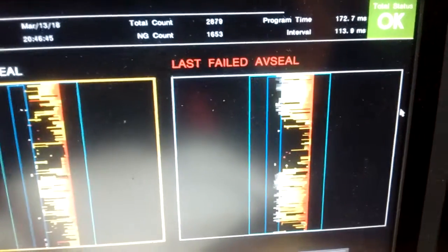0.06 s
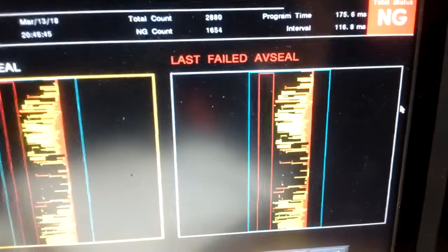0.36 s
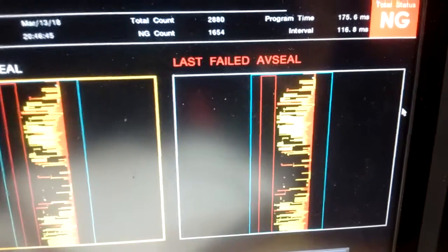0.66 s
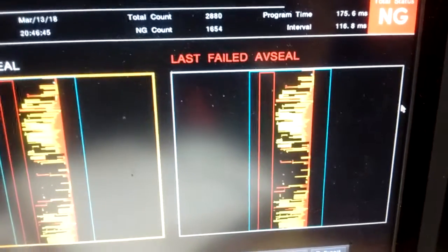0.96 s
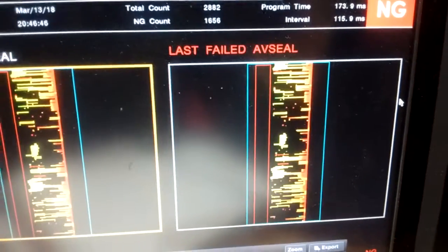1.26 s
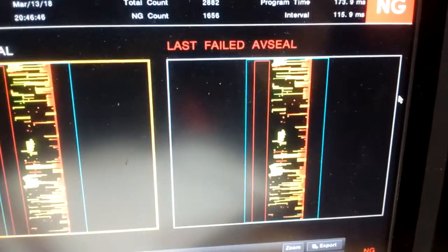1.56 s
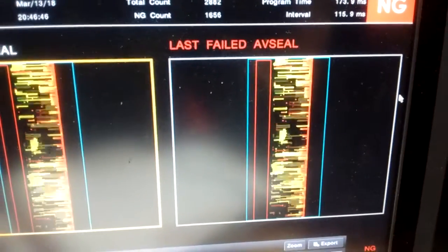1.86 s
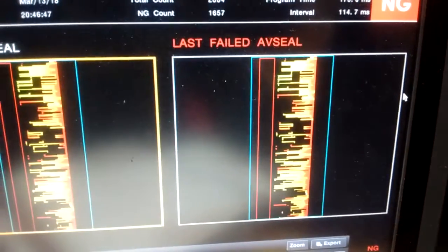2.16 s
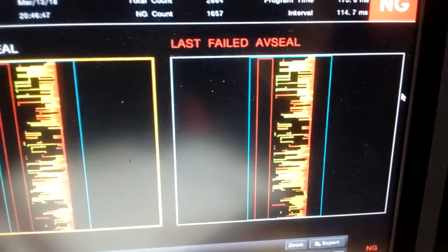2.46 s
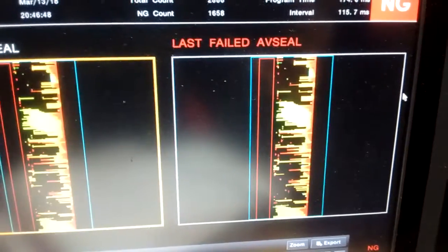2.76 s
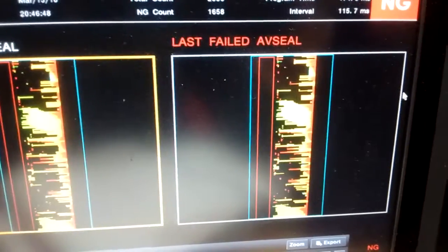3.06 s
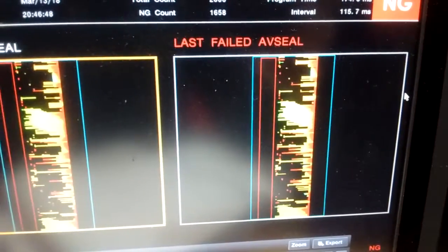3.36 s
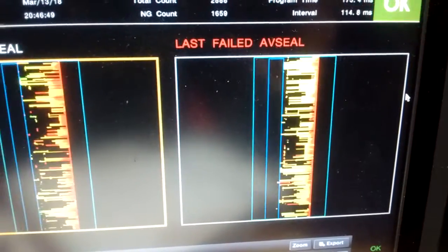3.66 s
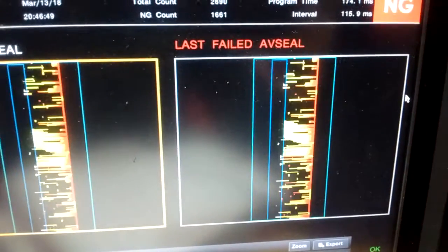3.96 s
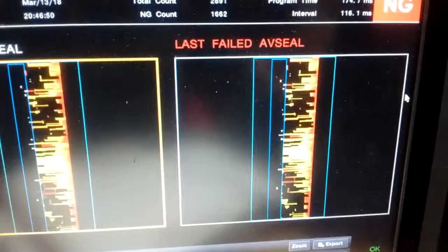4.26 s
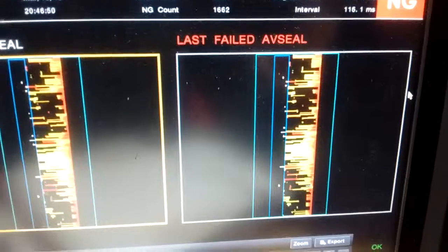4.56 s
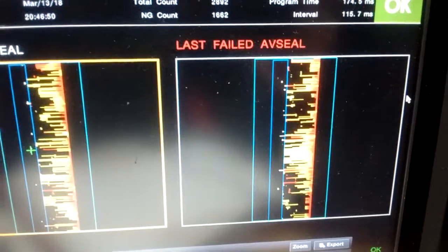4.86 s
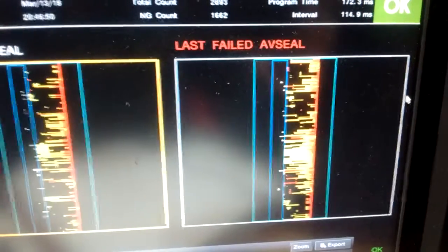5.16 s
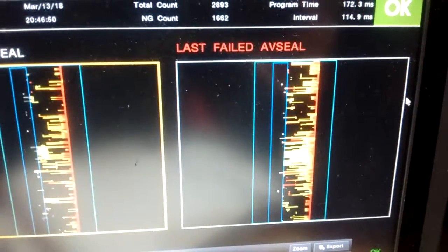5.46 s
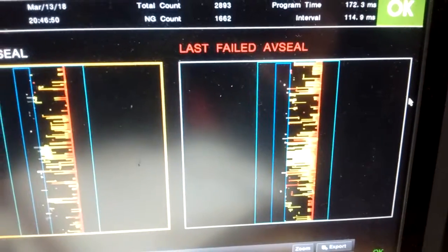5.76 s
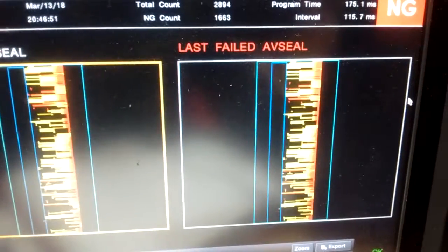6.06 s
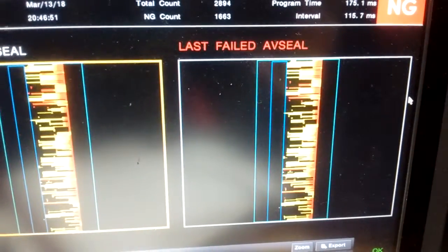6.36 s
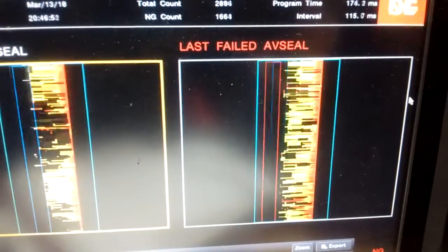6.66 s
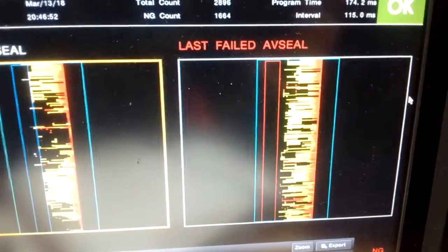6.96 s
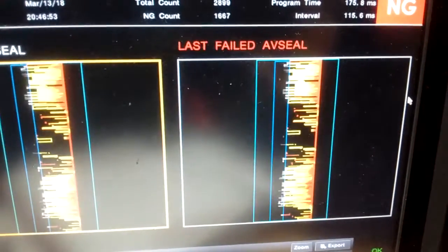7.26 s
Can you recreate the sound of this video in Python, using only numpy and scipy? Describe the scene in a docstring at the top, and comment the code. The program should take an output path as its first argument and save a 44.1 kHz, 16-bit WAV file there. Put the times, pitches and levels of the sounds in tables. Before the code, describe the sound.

A deep, throbbing drone from a shaking feeder tray dominates a factory packing line, over steady air hiss, churning parts and fast, even puffs with small metal pings. The drone stops with a brief ring a little past the middle, then a motor's hum and thin whistle fade too. The machine keeps cycling as packs brush a guide rail and one slaps onto a chute, sliding down with hollow thuds.

```python
"""A loud, throbbing drone fills a factory hall: a feeder tray on a packing line, shaken by a magnet.
The feeder cuts out, and a drive motor hums and whines for a second longer. All along, a machine keeps
cycling: air hisses, a jet puffs, the works churn and a metal part rings once a stroke. Late on, packs
scrape a rail and one knocks and tumbles down a chute. An automatic volume control holds the loud
drone down, so the rest comes up once it is gone."""
import sys
import numpy as np
from scipy import signal
from scipy.fft import rfft, irfft, next_fast_len
from scipy.io import wavfile
from scipy.ndimage import uniform_filter1d, map_coordinates

SR = 44100
rng = np.random.default_rng(int(sys.argv[2]) if len(sys.argv) > 2 else 0)


def store_wav(level_fs):
    """Save 16-bit WAV to argv[1]."""
    pcm = np.round(np.clip(np.atleast_2d(level_fs), -1, 1) * 32767)
    wavfile.write(sys.argv[1], SR, pcm.T.astype(np.int16))


N = 327663
T = np.arange(N) / SR
MAINS_HZ = 49.95  # the electric supply
STROKE_S, STROKE_START_S = .3867, .2  # the machine's cycle

# The feeder's drone: mains_multiple, level_db, lean_db (how much louder on the left than the right)
DRONE_TONES = [(2, -30.5, -9), (3, -44.5, -17), (4, -17.5, -6.5), (5, -22, 3.5), (6, -38.5, -16),
               (7, -50, 4), (9, -44, -8), (15, -48.5, -12)]
# Swings of the loaded tray, which throb against the drone: pitch_hz, level_db, lean_db
SWAY_TONES = [(212.5, -39.5, -3), (212, -46, -7), (222.5, -37, -7), (308.7, -45.5, 4)]
# The tray's own notes: pitch_hz, level_db, fade_s (a fade is the time taken to drop 60 dB)
TRAY_NOTES = [(259.4, -17, 0.48), (284.6, -16, 0.57)]
# Loose goods shaking on the tray: pitch_hz, level_db_per_hz
RATTLE_NOISE = [(90, -87), (170, -57.5), (203, -45), (212, -36.5), (226, -46), (240, -55), (280, -53),
                (310, -48.5), (335, -65.5), (600, -99)]
# The motor's magnetic hum: mains_multiple (rounded when played), level_db, lean_db
HUM_TONES = [(2, -34, -26), (4, -30, -13.5), (6, -35, -32), (8, -37.5, -6), (10, -38.5, -4),
             (11.9, -46, 15), (16, -41.5, -5), (18, -41, 3), (20, -40, -9), (22, -44.5, -5),
             (24, -43.5, -1), (30, -49.5, -3), (34, -44, 0), (36, -56, 3), (52, -48, 10)]
# Tones of its gears and its inverter (the speed control): pitch_hz, level_db, lean_db
WHINE_TONES = [(719, -42.5, 4), (772, -48, -16), (832, -49.5, -4), (866, -43.5, 1), (1009, -42, -1),
               (1118, -45, 0), (1354, -45, 1), (1528, -46, -1), (2860, -58, -7)]
# The inverter's thin whistle: pitch_hz, level_db_per_hz
WHISTLE_NOISE = [(14700, -110), (14980, -72), (15060, -59), (15107, -57), (15160, -64), (15260, -72),
                 (15500, -110)]
# The motor's cooling fan: pitch_hz, level_db_per_hz
FAN_NOISE = [(60, -81), (150, -62), (350, -68), (450, -57.5), (650, -62.5), (850, -57), (1150, -58),
             (1550, -60), (2100, -62), (2750, -55), (3050, -57), (3400, -60), (4200, -65.5), (5200, -65),
             (9000, -70), (14000, -74)]
# The air jet: pitch_hz, level_db_per_hz
JET_NOISE = [(5000, -109), (8300, -68), (9400, -61), (10900, -62.5), (12000, -67), (13200, -71.5),
             (14900, -69.5), (15500, -72)]
# The air leak: pitch_hz, level_db_per_hz
LEAK_NOISE = [(700, -94), (1800, -68.5), (2400, -64.5), (2750, -62.5), (3000, -70), (3300, -63.5),
              (3700, -64), (4100, -62.5), (4800, -68), (5500, -66), (6000, -66), (6700, -61.5),
              (7300, -59.5), (7750, -58), (8250, -59.5), (9000, -66.5), (11000, -70), (14000, -80.5)]
# Air pressure behind the jet and the leak: time_s, gain_db
AIR_PRESSURE = [(0, -0.5), (4.1, 0), (4.6, 2), (5.3, 0.8), (6.3, -1), (6.9, -1), (7.43, 0.2)]
# The machine's moving parts: pitch_hz, level_db_per_hz
CHURN_NOISE = [(25, -96), (45, -95), (65, -76), (90, -61), (125, -63.5), (185, -53.5), (260, -60),
               (350, -64.5), (500, -59.5), (700, -61.5), (1000, -61), (1500, -64), (2200, -70),
               (5000, -76.5)]
# Surges and lulls in their churning: middle_s, half_width_s, gain_db
CHURN_SURGES = [(.4, 0.042, 5.5), (2.78, 0.029, 3), (5.55, 0.026, -1.5), (6.92, 0.065, -2)]
# Brushes against the metal part: start_s, level_db
METAL_BRUSHES = [(.58, -24), (.967, -23), (1.353, -24.5), (1.74, -22), (2.126, -19), (2.513, -27),
                 (2.9, -26), (3.287, -26), (3.673, -25), (4.06, -24), (4.447, -23), (4.833, -26),
                 (5.22, -25), (5.606, -22), (5.993, -25), (6.38, -23.5), (6.766, -19), (7.153, -22)]
# The pack hitting the chute: start_s, thud_db, thud_hz, thud_fade_s, slap_gain_db
PACK_HITS = [(6.514, -6, 940, 0.012, 5.5), (6.517, -6, 404, 0.018, 7), (6.517, -13, 262, 0.044, 4),
             (6.595, -18, 165, 0.11, -3), (6.65, -22, 292, 0.09, 3), (6.675, -14.5, 271, 0.08, 5),
             (6.753, -20, 238, 0.07, 4), (6.797, -17, 245, 0.08, 5)]
# The pack slapping and sliding on the chute: pitch_hz, level_db_per_hz
CHUTE_NOISE = [(60, -88), (140, -57), (260, -47), (345, -59.5), (420, -53.5), (560, -60), (730, -52.5),
               (900, -58), (1050, -56.5), (1350, -60), (2000, -62), (3500, -64), (7000, -94)]
# Packs touching the guide rail: middle_s, half_width_s, gain_db
RAIL_TOUCHES = [(5.47, 0.01, -4), (6.22, 0.044, -5), (7.02, 0.0061, -5)]
# Their rubbing sound: pitch_hz, level_db_per_hz
RAIL_NOISE = [(300, -96), (700, -56), (1300, -54.5), (1800, -63), (3000, -86)]
# How alike left and right sound, and which leads: pitch_hz, likeness_0_to_1, left_lead_radians
STEREO_IMAGE = [(101, 0.92, 0.28), (485, 0.69, 1.44), (970, 0.72, -0.03), (1700, 0.9, 0.51),
                (2340, 0.3, -1.9), (2573, 0.98, -2.5), (2730, 0.98, -3), (3364, 1, -3), (3606, 0, -5.5),
                (4700, 1, -6.5), (4830, 0.84, -5.5), (5480, 0.1, -8.5), (6255, 1, -9.5),
                (7390, 0.36, -10.5), (7630, 1, -12), (8650, 0.53, -12), (9120, 0.3, -15), (9800, 0.47, -15),
                (11000, 0.2, -10.5), (11200, 0.8, -11), (12000, 0.15, -11.5), (14000, .34, -15.5),
                (15100, .6, -13.5)]
# Which side the noise is louder on: pitch_hz, lean_db
STEREO_LEAN = [(100, -5.5), (450, -3.5), (900, -4.5), (1500, -0.5), (2300, 2), (3200, -0.5), (4100, 2),
               (6200, -0.5), (7900, -4.5), (10500, -2), (12000, 4), (15000, 7)]


def feeder(off_s=4.195, coast_s=0.029, swing_rise_s=0.016):
    """A magnet shakes the tray in time with the mains; the load throbs against it and the goods rattle."""
    drone = sum(tone(round(multiple) * MAINS_HZ, db, lean, flutter_db=0, drift_radians=0.084)
                for multiple, db, lean in DRONE_TONES)
    sway = sum(tone(hz, db, lean, flutter_db=0.5, drift_radians=0.34) for hz, db, lean in SWAY_TONES)
    running = (drone + sway) * run_down(off_s + coast_s, fade_s=0.23)
    goods = pan(lean_db=-6.5) * noise(RATTLE_NOISE) * run_down(off_s, fade_s=0.67)
    # once the magnet lets go, the tray rings out on its own notes
    t = np.maximum(T - off_s, 0)
    notes = sum(amp(db - 60 * t / fade_s) * np.sin(2 * np.pi * hz * t) for hz, db, fade_s in TRAY_NOTES)
    swing = notes * (1 - np.exp(-t / swing_rise_s))
    return running + goods + pan(lean_db=0) * swing


def motor(off_s=5.14):
    """The motor hums, whines and whistles until its power goes; its fan spins on a little longer."""
    hum = 0
    for multiple, db, lean in HUM_TONES:
        lag = round(multiple) ** 2 * np.pi / 9  # the frame delays high tones more, smoothing the buzz
        hum += tone(round(multiple) * MAINS_HZ, db, lean, flutter_db=1.1, drift_radians=.12,
                    lag=lag, left_lead=stereo_lead(multiple * MAINS_HZ))
    whine = sum(tone(hz, db, lean, flutter_db=2.0, drift_radians=0.32, left_lead=stereo_lead(hz))
                for hz, db, lean in WHINE_TONES)
    whistle = pan(lean_db=11) * noise(WHISTLE_NOISE)
    fan = hall_noise(FAN_NOISE, ripple_db=1.2) * amp(0.98 * wobble(7))
    return (hum + whine + whistle) * run_down(off_s, fade_s=0.48) + fan * run_down(off_s, fade_s=1.0)


def air_jet(opens_s=0.054, open_for_s=0.23, rise_s=0.032, fall_s=0.075, seep_db=-22):
    """A valve lets out a puff of air once a stroke; a little seeps through while it is shut."""
    t = (T - STROKE_START_S - opens_s) % STROKE_S
    opening = 1 - np.exp(-t / rise_s)
    closing = bump(np.maximum(t, open_for_s), open_for_s, fall_s)
    flow = np.hypot(opening * closing, amp(seep_db))
    gain_db = 1.44 + pressure_db()
    return hall_noise(JET_NOISE, ripple_db=-2.5) * flow * amp(gain_db + 1.3 * wobble(38))


def air_leak(sag_db=2.5):
    """Leaking air hisses, and sags in mid-stroke while the jet draws on the same supply."""
    t = (T - STROKE_START_S) % STROKE_S
    gain_db = 1.5 + pressure_db() - sag_db * bump(t, middle_s=0.2, half_width_s=0.031)
    return hall_noise(LEAK_NOISE, ripple_db=1.2) * amp(gain_db + 0.88 * wobble(22))


def churning_parts(base_db=-0.27, swell_db=1.43, peak_s=0.056):
    """The moving parts churn harder twice a stroke: on the way out and on the way back."""
    strokes = (T - STROKE_START_S - peak_s) / STROKE_S
    stroke_db = base_db + swell_db * np.cos(2 * np.pi * 2 * strokes)
    surge_db = sum(db * bump(T, s, width) for s, width, db in CHURN_SURGES)
    churn = hall_noise(CHURN_NOISE, ripple_db=3.0)
    flicker_db = 0.46 * wobble(12) + 1.26 * wobble(45)
    return churn * amp(stroke_db + surge_db + flicker_db)


def metal_pings(pitch_hz=2386, fade_s=0.19, rise_s=0.0045, rough_radians=.6):
    """A metal part is brushed once a stroke and gives a short, rough ring."""
    t = np.arange(SR // 2) / SR
    shape = amp(-60 * t / fade_s) * (1 - np.exp(-t / rise_s))
    brushes = np.zeros(N)
    for start_s, db in METAL_BRUSHES:
        brushes[round(start_s * SR)] = amp(db)
    loudness = signal.fftconvolve(brushes, shape / shape.max())[:N]
    ring = loudness * np.sin(2 * np.pi * pitch_hz * T + rough_radians * wobble(90))
    return np.array([ring, -ring])  # left and right swing opposite ways


def tumbling_pack(slap_fade_s=0.028, peak_s=6.645, stop_s=6.885, rise_db_per_s=60, fall_db_per_s=45):
    """A pack slaps onto the chute, then slides and tumbles with hollow thuds."""
    thuds, slaps = np.zeros(N), np.zeros(N)
    t = np.arange(SR // 3) / SR
    contact = 1 - np.exp(-t / .0005)  # each hit builds in half a millisecond
    for start_s, db, hz, fade_s, slap_db in PACK_HITS:
        start = round(start_s * SR)
        span = slice(start, start + len(t))
        thuds[span] += amp(db - 60 * t / fade_s) * contact * np.sin(2 * np.pi * hz * t)
        slaps[span] += amp(slap_db - 60 * t / slap_fade_s) * contact
    # the slide grows to a peak, then the pack slows and comes to rest
    slide_db = 2 - np.maximum(rise_db_per_s * (peak_s - T), fall_db_per_s * (T - peak_s))
    landed = T > PACK_HITS[0][0]
    slide = landed * amp(slide_db + 0.73 * wobble(140)) * run_down(stop_s, fade_s=0.049)
    scuffs = np.hypot(slide, slaps) * hall_noise(CHUTE_NOISE, ripple_db=1.5)
    low_cut = signal.butter(2, 135, "highpass", fs=SR, output="sos")  # trims the deep bass
    return signal.sosfilt(low_cut, pan(lean_db=-7) * thuds + scuffs)


def rail_scrapes():
    """Now and then a pack rubs along a guide rail, in a short grainy swell."""
    rubbing = sum(amp(db) * bump(T, s, width) for s, width, db in RAIL_TOUCHES)
    return hall_noise(RAIL_NOISE, ripple_db=0.5) * rubbing * amp(1.8 * wobble(120))


def pressure_db():
    """How much the air pressure lifts or lowers the jet and the leak at each moment."""
    return np.interp(T, *np.transpose(AIR_PRESSURE))


def hall_noise(spectrum, ripple_db, ripple_step_hz=22):
    """Stereo noise in the hall; echoes make some pitches a little louder and others softer."""
    size = next_fast_len(N)
    hz = np.fft.rfftfreq(size, 1 / SR)
    left, unrelated = rfft(rng.standard_normal((2, size))) * np.sqrt(SR / 2)
    likeness, lead = look_up(STEREO_IMAGE, hz)
    likeness = np.clip(likeness, 0, .998)
    right = (likeness * left + np.sqrt(1 - likeness ** 2) * unrelated) * np.exp(-1j * lead)
    pair = np.array([left, right]) * pan(look_up(STEREO_LEAN, hz)[0])
    steps_hz = np.arange(0, SR / 2, ripple_step_hz)
    ripple = ripple_db * np.interp(hz, steps_hz, rng.standard_normal(len(steps_hz)))
    return irfft(pair * amp(look_up(spectrum, hz)[0] + ripple), size)[:, :N]


def stereo_lead(hz):
    """How far the left wave runs ahead of the right at this pitch, in radians."""
    return look_up(STEREO_IMAGE, hz)[1]


def tone(hz, db, lean_db, flutter_db, drift_radians, lag=0, left_lead=0):
    """A steady stereo tone whose loudness and timing can waver a little."""
    phase = 2 * np.pi * hz * T - lag + drift_radians * wobble(4.95)
    loudness = np.sqrt(2) * amp(db + flutter_db * wobble(9))
    return pan(lean_db) * loudness * np.sin([phase, phase - left_lead])


def noise(spectrum):
    """One channel of noise, as strong at each pitch as the table says."""
    return filtered(rng.standard_normal(N), lambda hz: amp(look_up(spectrum, hz)[0]) * np.sqrt(SR / 2))


def filtered(x, gain_at):
    """Turn each pitch in x up or down by gain_at(hz)."""
    size = next_fast_len(N + SR // 4)
    return irfft(rfft(x, size) * gain_at(np.fft.rfftfreq(size, 1 / SR)), size)[..., :N]


def run_down(off_s, fade_s):
    """Full level until off_s, then a drop of 60 dB every fade_s."""
    return amp(-60 * np.maximum(T - off_s, 0) / fade_s)


def bump(t, middle_s, half_width_s):
    """A bell-shaped swell of height one."""
    return np.exp(-.5 * ((t - middle_s) / half_width_s) ** 2)


def wobble(per_second):
    """A smooth curve through this many random values a second."""
    return map_coordinates(rng.standard_normal(int(N * per_second / SR) + 4), [T * per_second])


def pan(lean_db):
    """Left and right gains that move a sound sideways and keep its power."""
    lean_db = np.atleast_1d(lean_db)
    gains = amp(np.array([lean_db, -lean_db]) / 2)
    return gains / np.sqrt(np.mean(gains ** 2, axis=0))


def look_up(table, hz):
    """Read a table's other columns at any pitch, gliding between its rows."""
    pitches, *columns = np.transpose(table)
    return [np.interp(np.log(hz + 1), np.log(pitches), column) for column in columns]


def amp(db):
    """Turn decibels into a number to multiply by."""
    return 10 ** (np.asarray(db) / 20)


def scene():
    """The whole packing line together."""
    return (feeder() + motor() + air_jet() + air_leak() + churning_parts()
            + metal_pings() + rail_scrapes() + tumbling_pack())


def record(dry, loud_db=-20.0, cut_share=0.56, window_s=0.17, top_hz=15550):
    """An automatic volume control turns loud stretches down; then the highest treble is cut off."""
    size = int(window_s * SR) | 1
    recent_power = uniform_filter1d(np.mean(dry ** 2, axis=0), size, origin=size // 2)
    recent_db = 10 * np.log10(np.abs(recent_power) + 1e-12)
    excess_db = np.maximum(recent_db - loud_db, 0)
    return filtered(dry * amp(-cut_share * excess_db), lambda hz: hz < top_hz)


dry = scene()
out = record(dry)
store_wav(out)
```